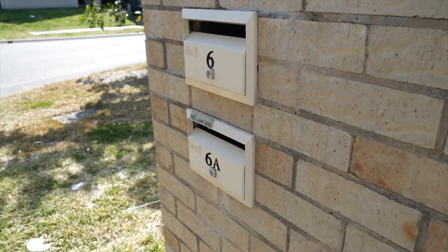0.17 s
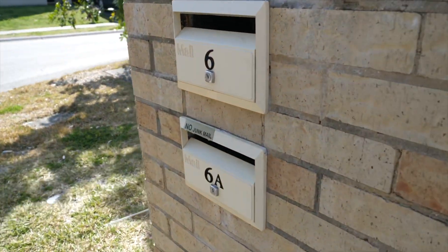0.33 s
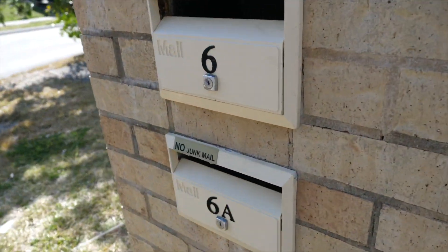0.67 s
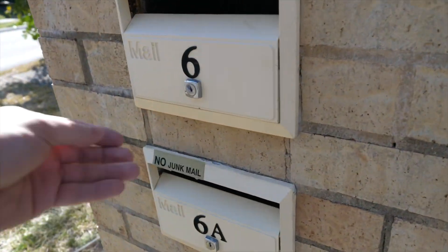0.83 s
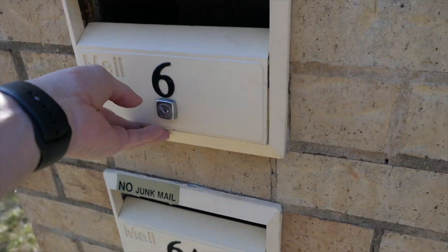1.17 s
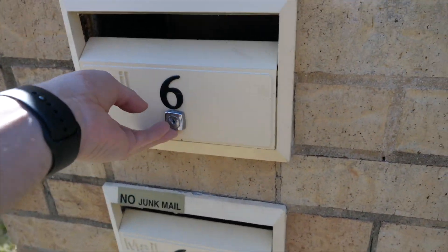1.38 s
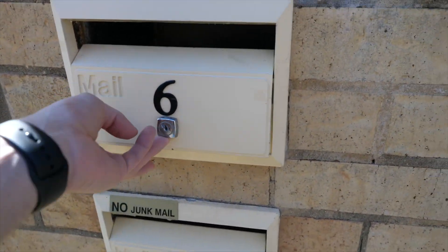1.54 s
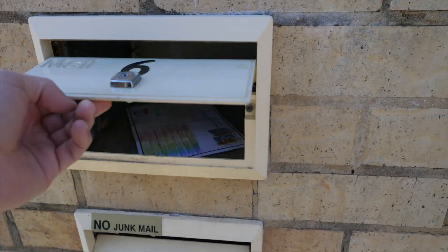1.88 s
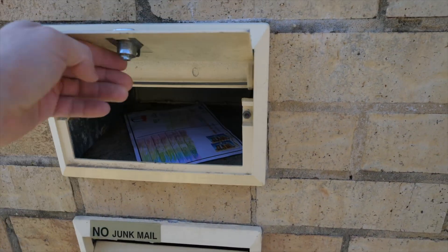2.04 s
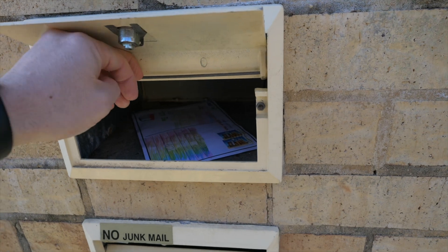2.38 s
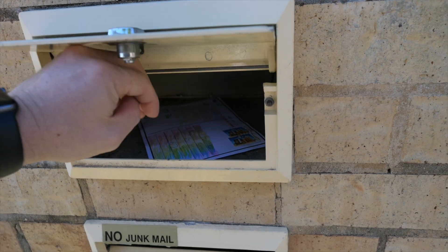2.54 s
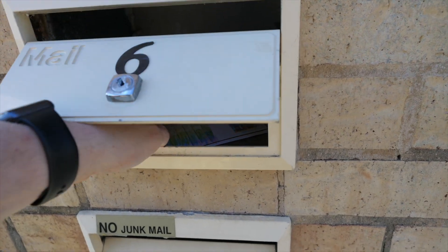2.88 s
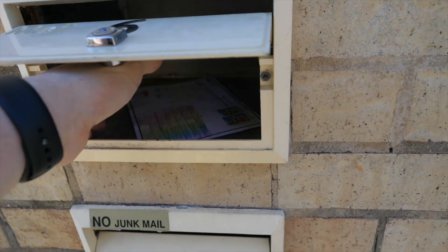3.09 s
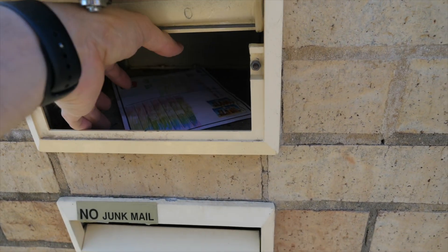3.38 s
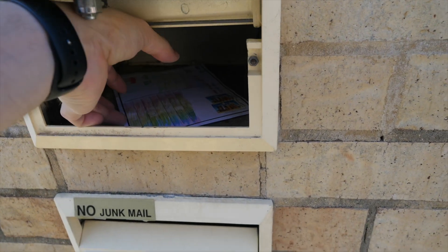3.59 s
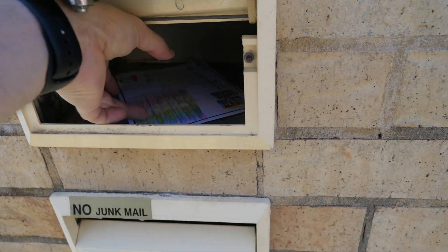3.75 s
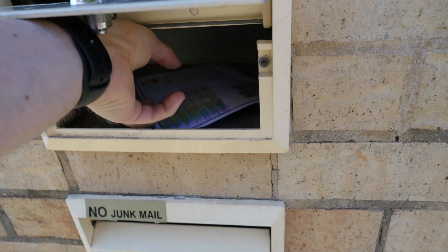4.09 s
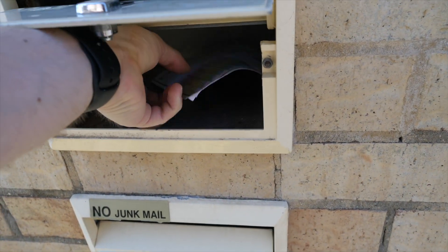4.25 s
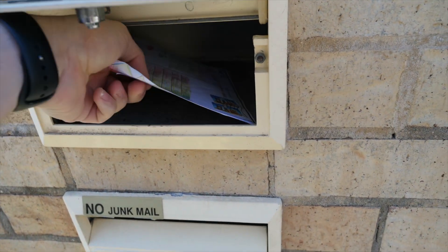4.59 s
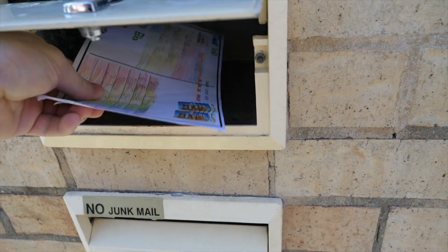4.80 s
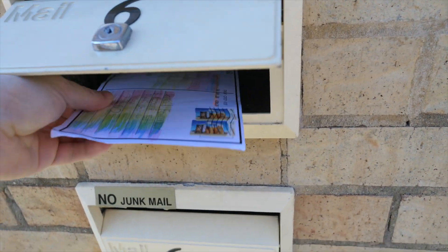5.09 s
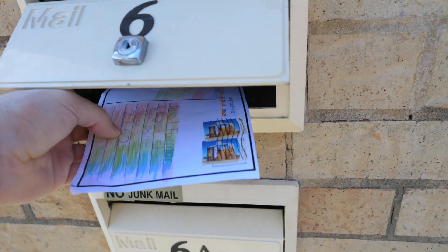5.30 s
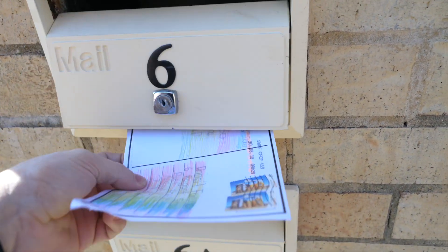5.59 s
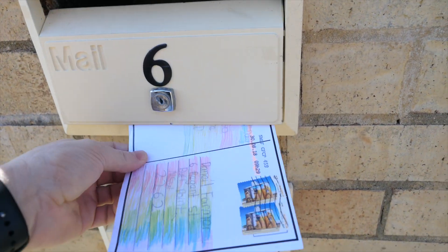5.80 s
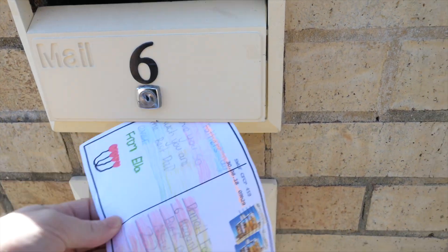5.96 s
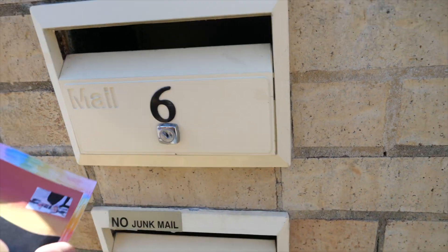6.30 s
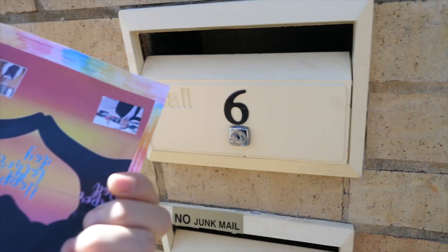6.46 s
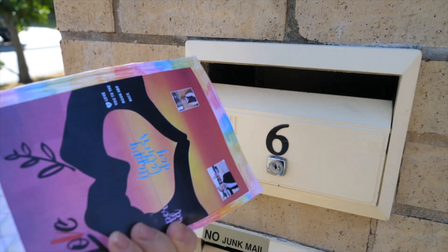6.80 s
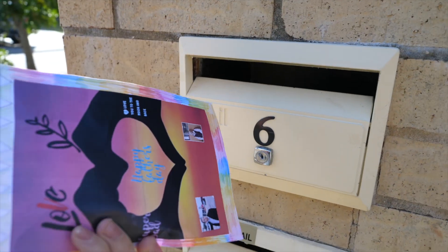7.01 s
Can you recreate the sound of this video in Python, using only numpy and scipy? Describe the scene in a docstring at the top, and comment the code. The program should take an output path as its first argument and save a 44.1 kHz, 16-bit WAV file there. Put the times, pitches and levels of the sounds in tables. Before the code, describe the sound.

A thin sheet-metal letterbox door clanks open, chatters on its hinge, fingers scrape a card out, and the door bangs shut in light wind.

```python
"""A sheet-metal letterbox door in a brick wall is lifted, clanks on its stop, chatters on its hinge and bangs shut.
Each blow is a buzz of re-contacts that shakes the sheet and pumps modes of panel, hinge and box.
Fingers scrape a postcard off the box floor and it slides out: stick-slip noise, fibre hiss and dry taps.
Filtered noise makes light wind on a close microphone that overloads on the clanks, and a quiet street;
gliding sines make a far bird."""
import sys
import numpy as np
from scipy import signal
from scipy.fft import rfft, irfft
from scipy.io import wavfile
from scipy.ndimage import uniform_filter1d

SR = 44100
rng = np.random.default_rng(int(sys.argv[2]) if len(sys.argv) > 2 else 0)


def digitize_waveform(pressure):
    """Quantize a signal to 16-bit integers and store it at the path in sys.argv[1].

    Rows of a 2-D input are taken as channels; values are limited to [-1, 1].
    """
    field = np.atleast_2d(pressure).T
    bounded = np.clip(field, -1, 1)
    quanta = np.round(bounded * 32767).astype(np.int16)
    wavfile.write(sys.argv[1], SR, quanta)


N = 314781
TIME_S = np.arange(N) / SR
AGE_S = np.arange(20000) / SR  # time since the start of one event
COUNT = len(AGE_S)


def undb(db):
    """Decibels to gain."""
    return 10 ** (np.asarray(db) / 20)


def unit(x):
    """Scale to rms 1."""
    return x / np.sqrt(np.mean(x ** 2) + 1e-20)


def attack_unit(x):
    """Scale so that the loudest 10 ms have rms 1."""
    return x / np.sqrt(uniform_filter1d(x ** 2, size=441).max())


def fade(t60_s):
    """Exponential decay, 60 dB down after t60_s."""
    return np.exp(-np.log(1000) * AGE_S / max(t60_s, 1e-3))


def colour(x, points, tilt_db_per_octave=0, size=8192):
    """Causal minimum-phase filter with a (Hz, dB) spectrum, tilted about 2 kHz."""
    hz, db = np.transpose(points)
    octave = np.log2(np.maximum(np.fft.rfftfreq(size, 1 / SR), 1))
    gain_db = np.interp(octave, np.log2(hz), db)
    gain_db = gain_db + tilt_db_per_octave * np.clip(octave - 11, -3, 3)
    # folding the cepstrum forward in time makes the filter causal
    cepstrum = irfft(np.log(undb(gain_db)))
    log_spectrum = rfft(2 * cepstrum[:size // 2], size) - cepstrum[0]
    response = irfft(np.exp(log_spectrum))
    return signal.oaconvolve(x, response)[:len(x)]


def grit(count, spread_db):
    """Dense tiny contacts of very unequal size."""
    size_db = spread_db * np.minimum(rng.exponential(size=count), 5)
    return unit(rng.standard_normal(count) * undb(size_db))


def walk(steps_per_s):
    """Slow random wandering, rms 1: held random steps smoothed twice."""
    k = int(SR / steps_per_s)
    steps = np.repeat(rng.standard_normal(N // k + 1), k)
    smooth = uniform_filter1d(uniform_filter1d(steps, k), k)
    return unit(smooth[:N])


def ring(modes, tilt_db_per_octave=0, scatter_db=1.0):
    """Decaying modes; each point of contact weights them a little differently."""
    out, age = 0, AGE_S.astype(np.float32)
    draws = rng.standard_normal((len(modes), 2))
    for (hz, db, t60_s), (size, turn) in zip(modes, draws):
        gain = float(undb(db + scatter_db * size + tilt_db_per_octave * np.log2(hz / 2000)))
        decay = np.exp(np.maximum(age * float(-np.log(1000) / t60_s), -20))
        out = out + gain * decay * np.sin(2 * np.pi * (float(hz) * age + float(turn)))
    return attack_unit(out)


def add(track, s, sound):
    """Mix a sound into the track at time s."""
    i = int(s * SR)
    track[i:i + len(sound)] += sound[:N - i]


# Spectrum of street hush. Each row: frequency in Hz, gain in dB.
STREET_SPECTRUM = [(71, -41), (120, -6), (246, -3.5), (473, -11), (546, -17.5), (630, -11), (2150, -20.5),
                   (5630, -25.5), (8840, -30), (13300, -40.5), (16000, -39)]
# Spectrum of wind on the microphone. Each row: frequency in Hz, gain in dB.
WIND_SPECTRUM = [(4, -8), (10, -2), (20, -12), (40, -16.5), (80, -26), (150, -33.5), (300, -53),
                 (800, -76.5)]
# Gusts. Each row: peak time in seconds, half width (to 1/e) in seconds, peak level in dB.
GUSTS_ON_MIC = [(.45, 0.056, -26.5), (.65, 0.082, -25.5), (1.06, 0.2, -32.5), (1.55, 0.17, -30),
                (1.91, .06, -28), (2.69, .035, -26), (3.27, 0.12, -22), (4.34, 0.024, -34.5),
                (4.841, 0.065, -25.5), (5.01, 0.062, -20), (5.21, 0.091, -21.5), (5.59, 0.031, -24.5),
                (6.15, 0.17, -29.5), (6.639, 0.086, -25.5), (6.79, .05, -24.5), (7.09, 0.13, -25)]
BREEZE_DB, BREEZE_WANDER_DB, BREEZE_STEPS_PER_S = -34, 0.95, 6.4
STREET_DB, STREET_WANDER_DB, STREET_STEPS_PER_S = -50, 0.51, 3.4


def outdoors():
    """A wandering breeze and short gusts buffet the microphone over the hush of a quiet street."""
    breeze = undb(BREEZE_DB + BREEZE_WANDER_DB * walk(BREEZE_STEPS_PER_S))
    gusts = 0
    for s, width_s, db in GUSTS_ON_MIC:
        bump = np.exp(-np.minimum(((TIME_S - s) / width_s) ** 2, 20))
        gusts = gusts + undb(db) * bump
    wind = unit(colour(rng.standard_normal(N), WIND_SPECTRUM)) * np.hypot(breeze, gusts)
    hush = unit(colour(rng.standard_normal(N), STREET_SPECTRUM))
    hush_gain = undb(STREET_DB + STREET_WANDER_DB * walk(STREET_STEPS_PER_S))
    return wind + hush * hush_gain


# Distant bird. Each row: start in seconds, length in seconds, starting pitch in Hz,
# pitch it sinks towards in Hz, level at the swell's peak before flutter in dB.
BIRD_WHISTLES = [(0.012, 0.1, 2870, 2800, -56), (.16, .18, 2900, 2370, -59),
                 (3.687, 0.49, 3500, 3134, -38.5)]
GLIDE_S, PEAK_SHARE = 0.11, 0.52  # pitch time constant; loudest point as share of length


def bird(waver_hz=14, flutter_db=3, rise_db=5, fall_db=22):
    """Each whistle sinks towards a steady pitch, swells and fades, and flutters on its way."""
    out = 0
    flutter = flutter_db * walk(50)
    waver = waver_hz * walk(150)
    for s, length_s, start_hz, end_hz, db in BIRD_WHISTLES:
        age = np.clip(TIME_S - s, 0, length_s)
        hz = end_hz + (start_hz - end_hz) * np.exp(-age / GLIDE_S)
        swell_db = np.interp(age / length_s, [0, PEAK_SHARE, 1], [-rise_db, 0, -fall_db])
        sounding = np.minimum(np.minimum(age, length_s - age) / .015, 1)  # 15 ms ramps
        tone = np.sin(2 * np.pi * np.cumsum(hz + waver) / SR)
        out = out + sounding * undb(db + swell_db + flutter) * tone
    return out


# Door panel modes. Each row: frequency in Hz, gain in dB, t60 held open in seconds, t60 shut in seconds.
PANEL_MODES = [(740, -7, .06, .12), (835, -19, .65, .05), (975, -7, .09, .08), (1035, -5, .07, .12),
               (1086, -2, .15, .06), (1356, -3, .1, .12), (1425, -11, .1, .2), (1520, -1, .19, .08),
               (1604, 0, .12, .28), (1875, -9, .09, .12), (2228, -4, .1, .06), (2315, -7, .25, .22),
               (2447, -3, .14, .12), (2523, -4, .08, .22), (3030, -2, .1, .13), (3746, -4, .1, .15),
               (4037, -5, .12, .09), (4975, -6, .12, .1), (5540, -9, .2, .17), (6222, -6, .08, .04),
               (6407, -4, .08, .08), (6839, -1, .09, .09), (7276, -1, .1, .11), (7850, -6, .09, .08),
               (8620, -1, .06, .1), (8870, -4, .13, .1), (13010, -15, .1, .08)]
OPEN_PANEL = [(hz, db, open_s) for hz, db, open_s, _ in PANEL_MODES]
# Spectrum of card friction. Each row: frequency in Hz, gain in dB.
CARD_SPECTRUM = [(150, -49), (250, -12), (547, -3), (1080, -2.5), (1760, -5.5), (3460, -12), (3840, -10.5),
                 (6140, -15.5), (8700, -13), (10400, -26), (13200, -18), (16000, -36)]
# Sliding card and brushing sleeve. Each row: start in seconds, length in seconds,
# level before swell and unevenness in dB, swell over the stroke in dB, tilt in dB per octave.
CARD_STROKES = [(0.684, 0.087, -46.5, -1, 1), (0.803, 0.11, -58, 5, 1), (1.18, 0.42, -58, -3, 0),
                (4.299, 0.3, -46, 2.5, .5), (4.667, .12, -39, -1.5, -0.5), (4.845, 0.28, -45.5, -3, 1.5),
                (5.195, 0.14, -43.5, -3.5, 1.5), (5.385, 0.22, -54.5, 7, 1), (5.899, 0.23, -32, 1, 2),
                (6.196, 0.099, -35, -3.5, -5), (6.47, 0.16, -46.5, -8, 4), (6.772, 0.044, -46, -0.5, 1.5),
                (6.972, 0.038, -42.5, 0, 0), (7.07, .07, -52, 0, 1)]
STROKE_ATTACK_S, STROKE_RELEASE_S = 0.043, 0.042


def card(grain_db=2.5, panel_db=-10, uneven_db=2.16, crinkle_db=-11, crinkles_per_s=70, catch_db=5):
    """Paper fibres drag over the metal edge, hissing and faintly ringing the door; the card crinkles as it bends."""
    crinkle = unit((rng.random(N) < crinkles_per_s / SR) * rng.standard_normal(N))
    drag = grit(N, grain_db) + undb(crinkle_db) * crinkle
    # the edge catches and lets go, so the door is rung in fits
    catches = undb(catch_db * walk(70))
    damped_panel = ring(OPEN_PANEL, tilt_db_per_octave=-7) * fade(0.24)
    rung = unit(signal.oaconvolve(drag * catches, damped_panel)[:N])
    out = np.zeros(N)
    for s, length_s, db, swell_db, tilt in CARD_STROKES:
        # a stroke picks up speed, holds, and dies away when the hand stops
        pick_up = np.minimum(AGE_S / STROKE_ATTACK_S, 1)
        speed = pick_up * np.exp(-np.maximum(AGE_S - length_s, 0) / STROKE_RELEASE_S)
        gain = speed * undb(db + swell_db * np.minimum(AGE_S / length_s, 1))
        during = (int(s * SR) + np.arange(COUNT)) % N
        hiss = unit(colour(drag[during], CARD_SPECTRUM, tilt))
        add(out, s, gain * (hiss + undb(panel_db) * rung[during]))
    return out * undb(uneven_db * walk(45))


# Hollow of the box. Each row: frequency in Hz, gain in dB, t60 in seconds.
BOX_MODES = [(160, -9, .09), (205, -5, .11), (224, 0, .14), (255, -7, .08), (290, -4, .08), (348, -6, .08),
             (430, -9, .07), (497, -10, .1), (580, -13, .07)]
# Fingers and card scraping in the box. Each row: start in seconds, length in seconds,
# box boom in dB, scratch in dB, tilt in dB per octave.
BOX_SCRAPES = [ (3.552, 0.071, -27.5, -37.5, -2), (3.679, 0.059, -25.5, -37, -0.5),
               (3.792, 0.03, -35, -42, 3), (3.828, 0.023, -27, -40.5, -2.5),
               (3.88, 0.049, -25.5, -32.5, -2), (3.931, 0.039, -25, -28, -2.5),
               (4.015, 0.044, -27, -33.5, -7.5), (4.077, 0.03, -28, -41.5, 0),
               (4.126, 0.093, -26, -33, -0.5), (4.209, 0.047, -44, -36, -2), (4.435, 0.04, -36.5, -32.5, 1),
               (4.556, 0.041, -43, -30.5, 8), (6.706, 0.037, -48, -40.5, 4)]


def scrapes(slip_db=5, scratch_db=6.0, panel_db=-5, catch_db=4, catch_s=0.0031, box_tilt=-3):
    """Fingers stick and slip on the card; the box booms beneath it and the metal rings a little."""
    out = np.zeros(N)
    for s, length_s, box_db, db, tilt in BOX_SCRAPES:
        catches = unit(uniform_filter1d(rng.standard_normal(COUNT), int(catch_s * SR) + 1))
        arc = np.sqrt(np.abs(np.sin(np.pi * np.minimum(AGE_S / length_s, 1))))
        stroke = arc * undb(catch_db * catches)
        box = ring(BOX_MODES, box_tilt, scatter_db=0.4)
        boom = signal.fftconvolve(grit(COUNT, slip_db) * stroke, box)[:COUNT]
        slips = grit(COUNT, scratch_db) * stroke
        damped_panel = ring(OPEN_PANEL, tilt) * fade(0.22)
        metal = signal.fftconvolve(slips, damped_panel)[:COUNT]
        scratch = attack_unit(colour(slips, CARD_SPECTRUM, tilt))
        scratch = scratch + undb(panel_db) * attack_unit(metal)
        add(out, s, undb(box_db) * attack_unit(boom) + undb(db) * scratch)
    return out


# Dry taps of fingers and card. Each row: start in seconds, peak level in dB,
# centre in Hz, half width in octaves, t60 of the push in seconds.
DRY_TAPS = [ (.371, -36.5, 616, 0.19, 0.035), (0.437, -11.5, 1080, 0.51, 0.018),
            (1.314, -35.5, 387, 0.1, 0.064), (1.634, -27.5, 5940, 0.59, .025),
            (1.682, -34, 303, 0.28, 0.037), (4.399, -20, 1010, 1.4, 0.054), (4.452, -25, 900, 0.41, 0.11),
            (4.517, -21, 920, 0.36, 0.08), (4.79, -43, 2240, .7, .03), (4.829, -23.5, 1930, 0.51, 0.11),
            (4.884, -8.5, 1180, 0.62, 0.067), (4.965, -28.5, 1800, 1, 0.055), (6.019, -3, 690, 0.61, 0.052),
            (6.287, -9, 1860, 0.5, 0.019), (6.3, -7.5, 3270, 0.44, 0.0075), (6.337, -42, 3050, 1.2, .008),
            (6.388, -34, 5000, 0.67, .01), (6.411, -27.5, 706, 0.39, 0.012),
            (6.734, -21.5, 600, 0.73, 0.077), (6.931, -27.5, 1460, 0.61, 0.036),
            (7.107, -25, 1390, 0.87, 0.028)]


def taps(snap=12):
    """A sharp contact and a short dead rattle in one broad resonance."""
    out = np.zeros(N)
    octaves = np.arange(-10, 11) / 2
    for s, db, hz, half_width, t60_s in DRY_TAPS:
        push = rng.standard_normal(COUNT) * fade(t60_s)
        push[0] -= snap
        resonance_db = -10 * np.log10(1 + (octaves / half_width) ** 4) - np.abs(octaves)
        tap = colour(push, np.c_[hz * 2 ** octaves, resonance_db])
        add(out, s, undb(db) * tap / np.abs(tap).max())
    return out


def shimmer(t60_at_2khz_s, treble_loss=0.59, count=220):
    """The many weak, longer modes of the sheet; the high ones die sooner."""
    hz = rng.uniform(450, 13000, (count, 1)).astype(np.float32)
    age = AGE_S.astype(np.float32)
    damping = (np.log(1000) / t60_at_2khz_s * (hz / 2000) ** treble_loss).astype(np.float32)
    modes = np.sin(2 * np.pi * hz * age) * np.exp(-damping * age)
    return attack_unit(modes.sum(axis=0) * (1 - fade(0.034)))  # builds up gradually


SHUT_PANEL = [(hz, db, shut_s) for hz, db, _, shut_s in PANEL_MODES]
# Hinge rod modes. Each row: frequency in Hz, gain in dB, t60 in seconds.
HINGE_MODES = [(2301, 0, .11), (3068, -2, .08), (3090, -4, .07), (3739, -2, .11), (4013, -9, .09),
               (4506, -3, .09)]
# Spectrum of the sheet's crowded short modes. Each row: frequency in Hz, gain in dB.
SHEET_SPECTRUM = [(100, -28), (250, -8), (600, -8.5), (1000, 0.5), (1500, -0.5), (1900, -1), (2500, 1),
                  (4000, -1), (5000, -2), (7000, -2), (8900, -2.5), (9800, -17), (13000, -9.5),
                  (16000, -33)]
# Door blows. Each row: start in seconds, level in dB, chatter in seconds, then relative to that level
# box boom in dB, panel ring in dB and hinge ring in dB, last tilt in dB per octave.
DOOR_BLOWS = [ (1.512, -39.5, 0.011, 2.5, 2.5, 0, -7.5), (1.75, -35, 0.02, 1.5, -1, -3, -7.5),
              (1.765, -34.5, 0.0073, 1, -1.5, -29, -9), (1.912, -41, 0.0051, -11, -0.5, -6, -9.5),
              (2.083, 2, 0.014, -11, -10, -11, 1), (2.151, -36.5, 0.046, -14, -9, -23, -1.5),
              (2.245, -24.5, 0.0087, -7.5, 0.5, -12, -5.5), (2.297, -40, .004, -15, -8, -13, -4),
              (2.325, -7, 0.0064, -15, 0.5, -31, -4), (2.354, -11.5, 0.0011, -28, -27, -30, 1.5),
              (2.544, -38, 0.006, -33.5, 2.5, -9, -3), (2.555, -22.5, 0.0092, -6, -1.5, -0.5, -3),
              (2.635, -19.5, 0.0095, -24, 0, -13, -4), (2.65, -19, 0.024, -20, 6, 11, -3.5),
              (2.702, -1, 0.023, -22, -15, 6.5, 0), (2.799, -30.5, 0.0029, -10, -7, -0.5, -1.5),
              (2.862, -31.5, 0.016, -12, -21, -41.5, -5), (2.932, -38.5, 0.031, 2, -2, -11, -3.5),
              (2.958, -43.5, 0.0037, 7, 12.5, -12, -2.5), (3.002, -20, 0.002, -10.5, -8, -40, 0),
              (3.046, -24.5, 0.009, -16, -3, -0.5, -4.5), (3.069, -21.5, 0.068, -21, 4, -2, -3),
              (3.097, -26, 0.016, -33, -12, 0, -2), (3.1088, -17, 0.0014, -39, -2, -2.5, -1),
              (3.125, -25, 0.016, -35, -5, -24, -3), (3.202, -29, 0.01, -24, -18.5, 1.5, -4),
              (3.233, -35, 0.0055, -17, -0.5, -5, -6.5), (3.473, -34.5, 0.017, 3.5, 1, -26, -4.5),
              (3.517, -28.5, 0.019, 5, -14, -10, -5), (4.397, -26, 0.0042, -16, -14, -21, -5),
              (5.208, -36, 0.0056, -3, -18, -27, -4), (5.242, -35, 0.0043, 5, -21, -26, -7),
              (5.601, -12, 0.0021, -3, -1, -29, -6), (5.613, -4, 0.0056, -0.5, -2.5, -29, 2),
              (5.635, -10, 0.0078, -10, 0.5, -25, -0.5), (5.668, -25, 0.0046, 4, 8.5, -22, -6),
              (5.746, -27.5, 0.0028, -3, 5.5, -14, -7), (5.767, -14.5, 0.0028, -13.5, 0, -5, 1),
              (6.160, -10.5, 0.0038, -14.5, 1.5, -34, 1), (6.231, -14.5, 0.0053, -3, -1.5, -3, -3.5),
              (6.236, -9.5, 0.0082, -30, -17, -5, -2), (6.329, -29.5, 0.0099, -8, -21.5, -18, -8)]
LIFT_S, LET_GO_S = 2.0, 5.5  # panel is held open between these times


def door(sheet_t60_s=0.045, tail_t60_s=0.41, tail_db=-31, chatter_db=6.5, knock=5, choke_db=-9, choke_s=0.0055):
    """Each blow is a buzz of re-contacts as the door seats; these shake the sheet and pump up panel, hinge and box."""
    out = np.zeros(N)
    tail = undb(tail_db) * shimmer(tail_t60_s)
    for s, db, chatter_s, box_db, panel_db, hinge_db, tilt in DOOR_BLOWS:
        progress = AGE_S / max(chatter_s, 1e-3)
        buzz = np.exp(-progress ** 2)
        # one corner knocks first, then the whole edge seats
        force = grit(COUNT, chatter_db) * buzz * (1 - np.exp(-progress * 10))
        force[0] += knock * np.sqrt(chatter_s * 20)
        sheet = rng.standard_normal(COUNT) * fade(sheet_t60_s) + tail
        shaken = signal.fftconvolve(force[:COUNT // 4], sheet)[:COUNT]
        clatter = attack_unit(colour(shaken, SHEET_SPECTRUM, tilt))
        # the hand damps other modes than the frame does
        panel = ring(OPEN_PANEL if LIFT_S < s < LET_GO_S else SHUT_PANEL, tilt)
        tones = undb(panel_db) * panel
        tones = tones + undb(hinge_db) * ring(HINGE_MODES)
        tones = tones + undb(box_db) * ring(BOX_MODES)
        # a firm new contact chokes whatever still rings; full choke from -21.5 dB up
        firmness = min(undb(db + 21.5), 1)
        i = int(s * SR)
        out[i:i + COUNT] *= undb(choke_db * firmness * np.minimum(AGE_S / choke_s, 1))
        # the modes gather energy for as long as the door chatters
        add(out, s, undb(db) * (clatter + np.sqrt(1 - buzz ** 2) * tones))
    return out


def scene():
    """Everything at the letterbox, in mono."""
    return (door() + taps() + scrapes() + card() + bird() + outdoors())[None]


def record(dry, top_hz=16100):
    """The overloaded microphone clips at full scale, then a steep low-pass cuts the top."""
    clipped = np.clip(dry, -1, 1)
    low_pass = signal.ellip(8, .2, 70, top_hz, fs=SR, output="sos")
    return signal.sosfilt(low_pass, clipped)


dry = scene()
out = record(dry)
digitize_waveform(out)
```